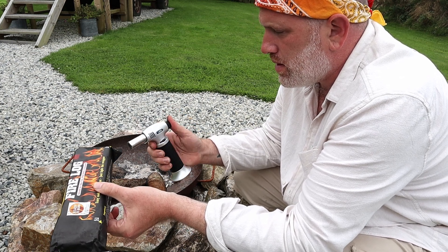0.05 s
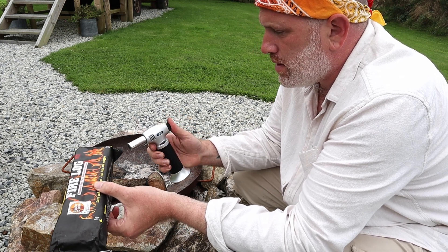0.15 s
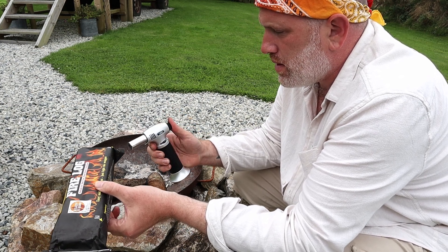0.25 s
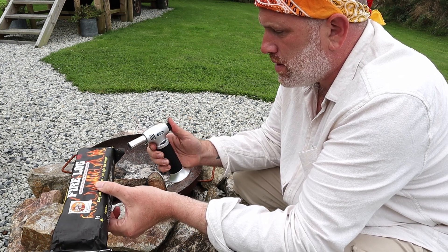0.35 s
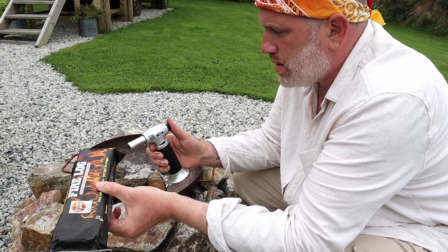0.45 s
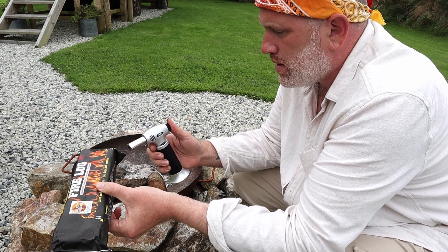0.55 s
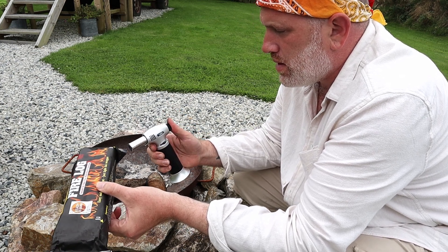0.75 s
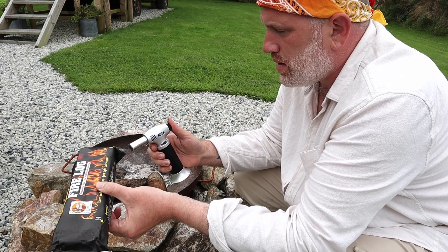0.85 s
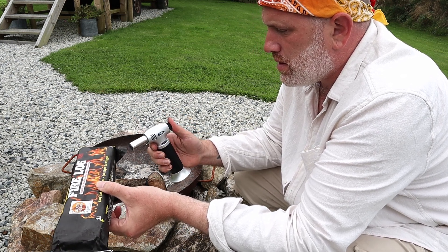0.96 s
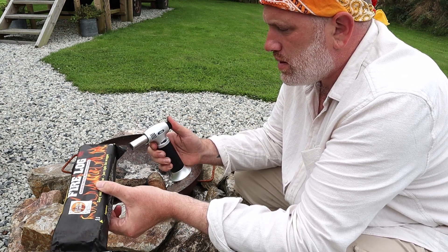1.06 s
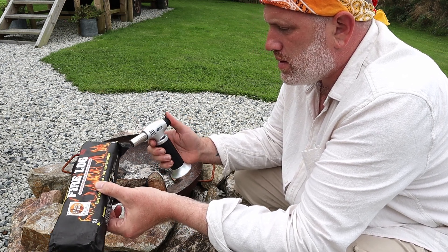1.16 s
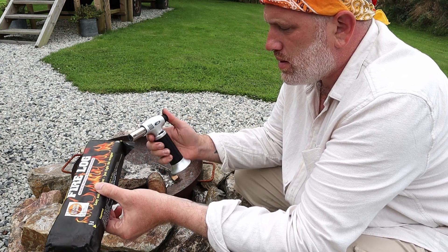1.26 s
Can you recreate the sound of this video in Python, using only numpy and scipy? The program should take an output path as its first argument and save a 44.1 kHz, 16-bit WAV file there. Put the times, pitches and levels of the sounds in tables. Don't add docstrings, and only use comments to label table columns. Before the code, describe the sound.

A handheld gas torch, close and dry, in quiet open air with a faint low breeze. At about 0.08 s gas opens with a thin, bright hiss. At 0.23 s a loud, sharp igniter snap with tiny bounces and a low puff lights it. A hollow, hissing roar follows, with uneven tearing flares, notably around 0.5, 0.7 and 1.1 s. A soft pop comes at 1.14 s; at 1.23 s it clicks shut, leaving quiet air.

```python
import sys
import numpy as np
from scipy import signal
from scipy.fft import rfft, irfft
from scipy.io import wavfile

SR = 44100
rng = np.random.default_rng(int(sys.argv[2]) if len(sys.argv) > 2 else 0)


def makeup_ratio(level_db):
    decades = np.asarray(level_db, float) / 20
    return 10 ** decades


def waveform_to_disk(signal):
    frames = np.transpose(np.atleast_2d(signal))
    scaled = np.clip(frames, -1, 1) * 32767
    samples = np.round(scaled).astype(np.int16)
    wavfile.write(sys.argv[1], SR, samples)


N = 57330
T = np.arange(N) / SR

OPEN_S, OPEN_RISE_S = 0.081, 0.017
SPARK_S, CATCH_S = 0.2305, 0.019
SHUT_S, SHUT_DB_PER_S = 1.228, 248


def evened(x):
    return x / np.sqrt(np.mean(x ** 2) + 1e-20)


def noise(gain):
    spectrum = rfft(rng.standard_normal(N))
    hz = np.fft.rfftfreq(N, 1 / SR) + 1
    return evened(irfft(spectrum * gain(hz), N))


def slope(points, hz):
    f, db = np.transpose(points)
    return makeup_ratio(np.interp(np.log(hz), np.log(f), db))


def curve(points):
    return makeup_ratio(np.interp(T, *np.transpose(points)))


def band(hz, centre_hz, octaves):
    return np.exp(-0.5 * (np.log2(hz / centre_hz) / octaves) ** 2)


def lowpass(hz, corner_hz):
    return 1 / (1 + (hz / corner_hz) ** 2)


def peaks(table, hz):
    return np.sqrt(sum(makeup_ratio(db) ** 2 / (1 + (2 * (hz - f) / w) ** 2) ** 2 for f, w, db in table))


def drifting(table):
    total = np.zeros(N)
    for row in table:
        f, width, db = row
        wander_db = 1.5 * noise(lambda hz: lowpass(hz, 10))
        total += makeup_ratio(db + wander_db) * np.sqrt(width) * noise(lambda hz: peaks([row], hz))
    return evened(total)


def decay(s, db, t60):
    return makeup_ratio(db - 60 * np.maximum(T - s, 0) / t60) * (T >= s)


def ring(s, db, hz, t60, phase=0):
    strike_s = 0.00055
    t = np.maximum(T - s, 0)
    return decay(s, db, t60) * np.sin(2 * np.pi * hz * t + phase) * np.minimum(t / strike_s, 1)


# f/Hz, width/Hz, depth (0-1)
GROUND_NOTCHES = [(1530, 67, 0.3), (3300, 140, 0.4), (4370, 270, 1), (5770, 220, 0.16)]


def notched(hz):
    dips = [1 - np.clip(depth, 0, 1) / (1 + (2 * (hz - f) / w) ** 2) for f, w, depth in GROUND_NOTCHES]
    return np.prod(dips, axis=0)


def lit():
    return np.clip((T - SPARK_S) / CATCH_S, 0, 1)


def shut():
    return makeup_ratio(-SHUT_DB_PER_S * np.maximum(T - SHUT_S, 0))


# f/Hz, level/dB per Hz
AIR = [(15, -19), (25, -9), (59, -13), (198, -26), (260, -13), (331, -16), (848, -17), (1340, -23.5),
       (15500, -37.5)]
# t/s, level/dB
BREEZE = [(0, -72), (.1, -67), (.2, -68), (.3, -63), (.55, -68), (.65, -68), (1.08, -94), (1.16, -69),
          (1.3, -68)]


def air():
    still = makeup_ratio(-64) * noise(lambda hz: slope(AIR, hz))
    breeze = noise(lambda hz: hz / (hz + 30) / (1 + (hz / 109) ** 4))
    return still + curve(BREEZE) * breeze


# t/s, level/dB, centre f/Hz, t60/s
TICKS = [
    (1.1485, -43, 2620, .03),
    (1.150, -42.5, 3350, .025),
    (1.234, -45, 5940, 0.014),
    (1.235, -43.5, 7870, 0.022),
    (1.2347, -45, 13500, 0.011),
    (1.2385, -44, 2220, 0.015),
]
# t/s, level/dB, f/Hz, t60/s
LATCH = [(1.2342, -30, 1400, .013), (1.2344, -38, 2000, .010), (1.2346, -34, 3000, .012),
         (1.2347, -42, 4200, .008)]


def trigger():
    out = sum(ring(*row) for row in LATCH)
    for s, db, centre_hz, t60 in TICKS:
        out += noise(lambda hz: band(hz, centre_hz, 0.36)) * decay(s, db, t60)
    return out


# f/Hz, width/Hz, level/dB
HOT = [(6360, 1000, -16.5), (8170, 1200, -4.5), (8800, 270, -13), (11370, 930, -12.5), (12460, 980, -6.5),
       (14000, 570, -7.5), (14800, 1000, -20)]
# f/Hz, level/dB, t60/s
SHELL = [(1474, -11, 0.012), (1740, -16, 0.017), (2000, -6.5, 0.011), (2650, -14, 0.012),
         (3640, -13.5, 0.02), (4350, -16, .012), (6340, -8.5, 0.016), (7470, -8.5, 0.016),
         (7880, -11.5, .018), (8465, -10, 0.02), (8960, -9, 0.012), (12110, -4, 0.0074),
         (13500, -2.5, 0.0082), (15000, -13.5, 0.011)]
# t/s, level/dB, treble tilt/dB per octave
SNAPS = [
    (.23045, -5.5, 0),
    (.2322, -17, 0),
    (.2352, -22, 0),
    (.2400, -35, 0),
]
# t/s, level/dB, f/Hz, t60/s
POPS = [
    (0.23, -27.5, 332, 0.026),
    (.234, -34, 206, 0.027),
    (0.24, -50.5, 122, 0.057),
    (.233, -40, 446, 0.029),
    (.235, -38.5, 150, 0.042),
    (1.1412, -39, 210, 0.03),
    (1.1432, -32, 320, 0.038),
    (1.1415, -39, 680, 0.036),
    (1.143, -42, 142, 0.043),
]


def igniter():
    out = sum(ring(*pop) for pop in POPS)
    phases = rng.uniform(0, 2 * np.pi, (len(SNAPS), len(SHELL)))
    crack = noise(lambda hz: np.hypot(peaks(HOT, hz), 0.4 / (1 + (1300 / hz) ** 6)))
    for (s, db, tilt_db), row in zip(SNAPS, phases):
        for (hz, level, t60), phase in zip(SHELL, row):
            out += ring(s, db + level + tilt_db * np.log2(hz / 2000), hz, t60, phase)
        out += crack * decay(s, db - 16, 0.022)
    return out


# f/Hz, width/Hz, level/dB
COLD = [(4630, 590, -2), (5230, 630, -2.5), (6780, 1100, -3.5), (8360, 1900, -4.5), (10000, 560, -10),
        (11300, 1200, -10.5), (12000, 450, -10), (13130, 510, 2), (13800, 1000, -6.5)]
# t/s, level/dB
JET = [(0.25, -51), (0.432, -56), (0.666, -51.5), (0.846, -56), (0.888, -53), (1.07, -51), (1.084, -55),
       (1.182, -50.5), (1.23, -55)]
# f/Hz, width/Hz, level/dB
COLLAR = [(3815, 150, 4), (4637, 520, 3), (5200, 880, -0.5)]
# t/s, level/dB
FACING = [(.25, -62), (.33, -59.5), (.46, -55.5), (.54, -57), (.66, -51), (.8, -57.5), (.84, -61),
          (1.05, -63), (1.23, -60)]


def jet():
    opened = np.clip((T - OPEN_S) / OPEN_RISE_S, 0, 1)
    cold = makeup_ratio(-51) * noise(lambda hz: np.hypot(peaks(COLD, hz), makeup_ratio(-30) * (hz > 3800)))
    hiss = drifting(HOT) + makeup_ratio(-15.5) * noise(lambda hz: hz > 2500)
    collar = noise(lambda hz: peaks(COLLAR, hz))
    hot = curve(JET) * hiss + curve(FACING) * collar
    return cold * opened * (1 - lit()) + hot * lit() * shut()


# peak t/s, rise/s, fall/s, level/dB, centre f/Hz
FLARES = [(.325, 0.022, 0.071, -52, 2760), (0.489, .015, 0.024, -50, 3240),
          (.555, .015, 0.016, -54.5, 3000), (.645, 0.057, 0.076, -50.5, 5200),
          (.695, 0.11, 0.083, -48.5, 2450), (0.909, 0.05, 0.014, -55, 3000),
          (1.089, 0.013, 0.021, -50.5, 2300), (1.126, 0.028, 0.022, -48.5, 2880),
          (1.151, 0.013, 0.042, -49, 2400), (1.205, 0.029, 0.01, -51, 3640),
          (1.262, 0.013, 0.024, -53.5, 1710), (1.262, .015, 0.018, -62.5, 5850)]


def flares():
    out = np.zeros(N)
    for s, rise, fall, db, centre_hz in FLARES:
        burst = noise(lambda hz: band(hz, centre_hz, 0.64) * notched(hz))
        swell = np.exp(-((T - s) / np.where(T < s, rise, fall)) ** 2)
        out += makeup_ratio(db) * burst * swell
    return out


# f/Hz, width/Hz, level/dB
BODY = [(280, 99, -5.5), (359, 83, -3), (529.5, 59, -3), (678.6, 128, -2), (1006, 128, -6),
        (1256, 92, -6.5), (1415, 200, -10), (1790, 204, -8.5), (2143, 180, -15), (2452, 72, -10),
        (2700, 93, -19.5)]
# f/Hz, level/dB per Hz
ROAR = [(40, -23), (120, -6.5), (250, -2), (700, -4.5), (1500, -11.5), (3000, -10), (6000, -18.5),
        (15000, -34)]
# t/s, level/dB
FLAME = [(0.25, -44.5), (0.284, -47), (0.614, -50), (0.67, -43.5), (0.702, -51), (0.924, -47), (1.074, -47),
         (1.134, -52), (1.142, -45), (1.19, -48), (1.218, -45), (1.23, -46)]


def flame():
    roar = drifting(BODY) + makeup_ratio(-4.5) * noise(lambda hz: slope(ROAR, hz) * notched(hz))
    flicker_db = 0.5 * noise(lambda hz: lowpass(hz, 60.3))
    starve_db = -3 * np.clip((T - 1.222) / CATCH_S, 0, 1)
    return curve(FLAME) * roar * makeup_ratio(flicker_db + starve_db) * lit() * shut()


def scene():
    return (air() + jet() + flame() + flares() + igniter() + trigger())[None]


def top_cut(x):
    return signal.sosfilt(signal.butter(12, 17080, fs=SR, output="sos"), x)


# f/Hz, level/dB
EDGE = [(0, 0), (15700, 0), (15900, -24), (16600, -30), (17000, -65), (SR / 2, -90)]


def record(dry):
    end_s, end_db_per_s = 1.295, 342
    faded = dry * makeup_ratio(-end_db_per_s * np.maximum(T - end_s, 0))
    hz, db = np.transpose(EDGE)
    edge = signal.firwin2(511, hz, makeup_ratio(db), fs=SR)[None]
    return top_cut(signal.oaconvolve(faded, edge, "same"))


dry = scene()
out = record(dry)
waveform_to_disk(out)
```